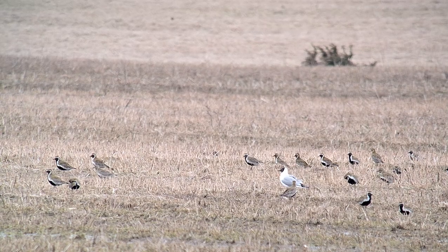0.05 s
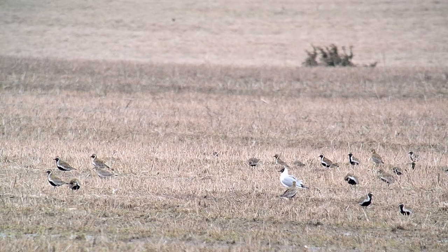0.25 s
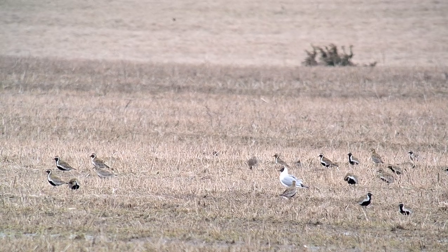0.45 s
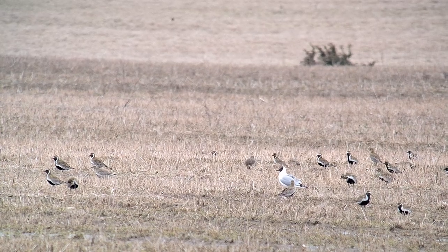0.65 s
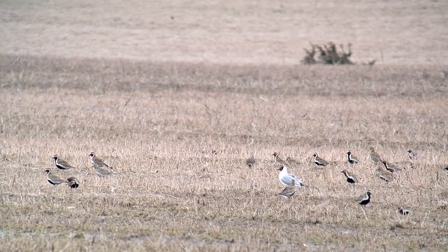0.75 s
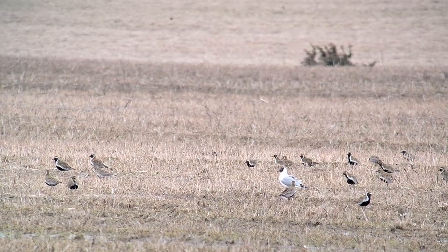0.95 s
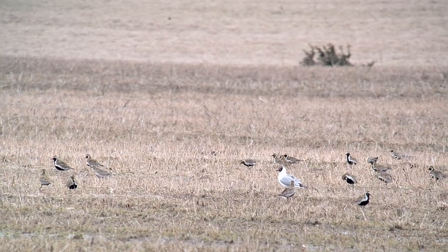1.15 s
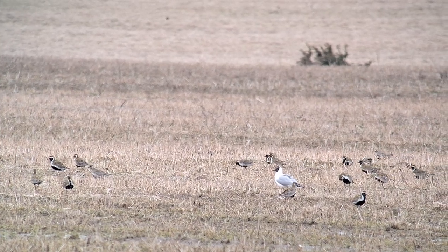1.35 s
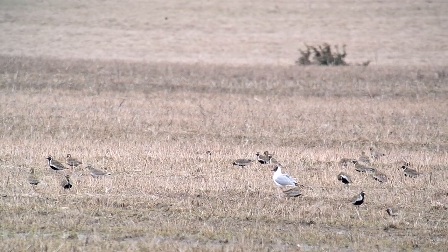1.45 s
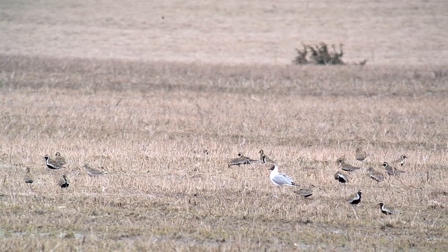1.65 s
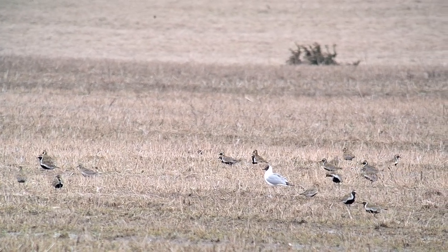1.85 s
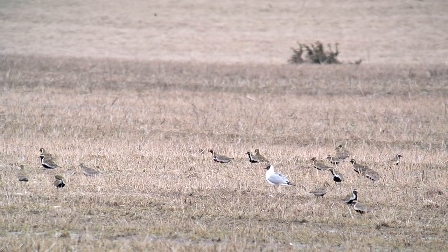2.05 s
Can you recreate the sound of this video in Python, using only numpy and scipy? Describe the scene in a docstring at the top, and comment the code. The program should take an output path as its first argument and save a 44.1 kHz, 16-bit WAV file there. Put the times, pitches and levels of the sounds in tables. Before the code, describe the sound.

Soft piping whistles from many far-off shorebirds, clearest in the second half, over a dry open field; heavy low wind thumps hit the microphone's left side early, fading to a low drone and light rustle.

```python
"""A flock of wading birds whistles far off on an open field: gliding tones, with hoarse squawks of noise.
Wind buffets the two microphone ports, mostly the left: low noise with short, sagging swings of pressure;
the faintest swings on the right are random swells of the low drone. Tiny clicks of the housing are
short fading tones. A distant drone, the rustle of the field and the hiss of the microphone
are coloured noise. After a short silence everything starts abruptly."""
import sys
import numpy as np
from scipy import signal
from scipy.fft import rfft, irfft, next_fast_len
from scipy.io import wavfile

SR = 44100
rng = np.random.default_rng(int(sys.argv[2]) if len(sys.argv) > 2 else 0)


def wav_out(sig):
    """Save sig, one row per channel (or a flat mono array), as 16-bit PCM at SR to the path in sys.argv[1]."""
    wavfile.write(sys.argv[1], SR, np.round(np.clip(np.atleast_2d(sig).T, -1, 1) * 32767).astype(np.int16))


def ratio(d):
    """dB to gain"""
    e = np.asarray(d, float) / 20
    return 10 ** e


N = 92610  # samples, 2.1 seconds


def rms_one(x):
    """Scales a sound so that its rms level is one."""
    return x / np.sqrt(np.mean(x ** 2) + 1e-20)


def in_time(rows):
    """Draws straight lines between (seconds, value) points, one value per sample."""
    seconds, values = np.transpose(rows)
    return np.interp(np.arange(N) / SR, seconds, values)


def drift(rate_hz, size=N):
    """Slow random wandering around zero, of rms one: noise smoothed twice."""
    r = np.exp(-2 * np.pi * rate_hz / SR)
    settle = 8000  # samples thrown away while the filter settles
    noise = rng.standard_normal(size + settle)
    return rms_one(signal.lfilter([1], [1, -2 * r, r * r], noise)[settle:])


def coloured(points):
    """Noise of rms one whose spectrum follows (Hz, dB) points; almost nothing outside them."""
    hz, db = np.transpose(points)
    size = next_fast_len(N)
    grid = np.arange(size // 2 + 1) * SR / size + 1  # the 1 avoids log(0)
    gain = ratio(np.interp(np.log(grid), np.log(hz), db, left=-120, right=-120))
    spectrum = rfft(rng.standard_normal(size)) * gain
    return rms_one(irfft(spectrum, size)[:N])


def sides(db):
    """Left and right gains that differ by db; positive is louder on the left."""
    return ratio(np.array([[.5], [-.5]]) * db)


# Loudness of the microphone hiss. Each row: time in seconds, level in dB.
HISS_LEVEL = [(.07, -74.5), (.3, -79), (.55, -79), (.8, -80.5), (1.25, -78), (1.6, -82), (2.1, -83)]
# Its tone colour. Each row: pitch in Hz, relative strength in dB per Hz.
HISS_COLOUR = [(900, -9.5), (1600, -1), (2300, -2.5), (3000, -6.5), (4500, -7), (6500, -13), (8400, -12),
               (12000, -8), (15500, -9.5)]


def microphone_hiss():
    """Hiss of the microphone: separate noise in each port, 1 dB stronger on the right."""
    noise = np.array([coloured(HISS_COLOUR) for _ in range(2)])
    return ratio(in_time(HISS_LEVEL)) * sides(-1) * noise


# Loudness of the distant drone. Each row: time in seconds, level in dB before the two noises are mixed.
DRONE_LEVEL = [(.1, -67), (.7, -65), (1.3, -65.5), (1.43, -62.5), (1.48, -59.5), (1.9, -60), (1.96, -62.5),
               (2.1, -64)]
# Its tone colour. Each row: pitch in Hz, relative strength in dB per Hz.
DRONE_TONE = [(40, -27.5), (60, 4.5), (90, 8), (130, -5.5), (210, -1), (290, -0.5), (340, -9.5),
              (390, -22.5), (520, -33)]


def distant_drone():
    """Low noise, partly the same in both ports and partly separate."""
    shared = coloured(DRONE_TONE)
    noise = np.array([0.7 * shared + 0.55 * coloured(DRONE_TONE) for _ in range(2)])
    return ratio(in_time(DRONE_LEVEL)) * sides(0.96) * noise


# Loudness of the field's rustle. Each row: time in seconds, level in dB.
RUSTLE_LEVEL = [(.07, -78), (.5, -83.5), (.8, -84), (.9, -79), (1.4, -76), (1.6, -81.5), (2.1, -84.5)]
# Its tone colour. Each row: pitch in Hz, relative strength in dB per Hz.
RUSTLE_COLOUR = [(250, -27), (400, 2), (600, -3.5), (1000, -4), (1500, -10), (2200, -27)]


def field_rustle():
    """Rustle of the field: mid-pitched noise, separate in each port."""
    noise = np.array([coloured(RUSTLE_COLOUR) for _ in range(2)])
    return ratio(in_time(RUSTLE_LEVEL)) * sides(1.7) * noise


def pressure_swing(u, hz, length, edge_db, db):
    """A few swings that sag in pitch, with a brief sharper edge; returns them and their outline."""
    spread = 0.6 * length  # seconds
    sag = 0.135  # share of the pitch lost per swing
    edge_s, edge_multiple = 0.0033, 2.31  # width of the edge; its pitch against the swing's
    shape = ratio(db) * np.exp(-.5 * (u / spread) ** 2)
    turn = 2 * np.pi * (hz * (u - sag * hz * u ** 2 / 2) + rng.random())
    edge_shape = ratio(db + edge_db) * np.exp(-.5 * (u / edge_s) ** 2)
    return shape * np.sin(turn) + edge_shape * np.sin(edge_multiple * turn), shape


# Low swings of pressure, left port then right: mostly wind buffets; the faintest on the right are
# random swells of the low drone. Each row: middle in seconds, peak of the outline in dB,
# pitch at the middle in Hz, length in seconds before the spread factor, sharp edge in dB against the peak.
PRESSURE_SWINGS = [
    [(0.139, -19.5, 89, 0.011, -13), (0.188, -23.5, 82.6, 0.015, -15.5), (0.21, -27.5, 68.4, 0.03, -35),
     (0.236, -36, 60, 0.0047, -18), (0.301, -28, 133.3, 0.0075, -14.5), (0.341, -30, 86, 0.026, -5.5),
     (0.359, -21, 75, 0.0053, -23), (0.379, -27, 62.5, 0.01, -24), (0.411, -29.5, 76.6, 0.011, -38),
     (0.474, -29.5, 91.2, 0.014, -12), (0.543, -33.5, 65.4, 0.011, -34), (0.569, -32, 66, 0.011, -43),
     (0.631, -36, 71.4, 0.022, -24), (0.676, -39.5, 70.6, 0.011, -33), (0.775, -36, 78.5, 0.013, -33),
     (0.818, -38.5, 73, 0.021, -26), (0.933, -38.5, 68.6, 0.02, -29), (1.021, -47.5, 52.5, 0.065, -19),
     (1.181, -45.5, 68, 0.013, -13), (1.317, -34, 66, 0.012, -31), (1.346, -42, 60.6, 0.0095, -20),
     (1.398, -37.5, 60.7, 0.01, -36), (1.454, -37.5, 62, 0.025, -32), (1.492, -42.5, 64, 0.014, -39),
     (1.525, -43, 72.5, 0.02, -27), (1.573, -38.5, 68, 0.014, -29), (1.609, -46, 79, 0.013, -2.5),
     (1.683, -52.5, 100, 0.012, -5)],
    [(0.089, -34, 77, 0.005, -31), (0.164, -35, 74.2, 0.0089, -19), (0.209, -38, 71.7, 0.022, -23),
     (0.27, -33, 71.4, 0.013, -33), (0.351, -38, 67, 0.017, -31), (0.43, -31.5, 61, 0.02, -35),
     (0.511, -38.5, 59.5, 0.023, -43), (0.543, -47, 84, 0.038, -38), (0.829, -48, 83, 0.044, -22),
     (1.033, -54, 58, 0.038, -1), (1.102, -49.5, 62.6, 0.045, -30), (1.575, -52.5, 98.5, 0.015, -10),
     (1.612, -50, 92, 0.011, -10)],
]
# Steady wind, left port, then right. Each row: time in seconds, level in dB before the trim and lumps.
STEADY_WIND = [
    [(.07, -40.5), (.12, -22), (.2, -27.5), (.35, -34.5), (.5, -35.5), (.6, -48), (.9, -52.5), (1.2, -59),
     (1.28, -61), (1.34, -48), (1.5, -49), (1.63, -63), (1.75, -63), (2.09, -57)],
    [(.07, -32.5), (.13, -33.5), (.2, -47), (.55, -52.5), (.62, -57.5), (.9, -63.5), (1.05, -59.5),
     (1.2, -57), (1.5, -59.5), (1.7, -63.5), (2.09, -56)],
]
# Tone colour of the wind. Each row: pitch in Hz, relative strength in dB per Hz.
WIND_TONE = [(20, -29), (32, -15.5), (45, 1.5), (88, -3), (130, -8.5), (200, -23), (300, -35.5), (450, -45),
             (700, -69)]


def wind_and_low_swings():
    """Each port has its own lumpy wind rumble and low swings; low noise swells with every swing."""
    trim_db, lumps_db, swing_noise_db = -6, 4, -12
    out, t = np.zeros((2, N)), np.arange(N) / SR
    for port in range(2):
        swell = np.zeros(N)
        for middle, db, hz, length, edge_db in PRESSURE_SWINGS[port]:
            near = slice(max(int((middle - .1) * SR), 0), int((middle + .1) * SR))
            swings, shape = pressure_swing(t[near] - middle, hz, length, edge_db, db)
            out[port, near] += swings
            swell[near] += shape
        bed = ratio(in_time(STEADY_WIND[port]) + trim_db + lumps_db * drift(10.0))
        out[port] += (bed + ratio(swing_noise_db) * swell) * coloured(WIND_TONE)
    return out


# Clicks. Each row: start in seconds, starting level in dB, pitch in Hz, left over right in dB.
CLICKS = [(.1005, -73, 5100, 3), (.1055, -73.5, 6150, -11.5), (0.1235, -52.5, 7830, -6),
          (.175, -58.5, 4320, -5)]


def housing_clicks():
    """Tiny clicks of the housing: short tones that die away at a steady dB rate."""
    t60_s = 0.0011  # seconds to fade by 60 dB
    out, u = np.zeros((2, N)), np.arange(300) / SR
    for start, db, hz, pan_db in CLICKS:
        i = int(start * SR)
        fade = ratio(db - 60 * u / t60_s)
        out[:, i:i + 300] += sides(pan_db) * fade * np.sin(2 * np.pi * hz * u)
    return out


def rough_burst(start, length, hz, width_hz, db, pan_db):
    """Noise squeezed into one band, swelling in and out and chopped unevenly."""
    swell_s, chop_db = .03, 2
    t = np.arange(N) / SR
    band = [hz - width_hz / 2, hz + width_hz / 2]
    sos = signal.butter(2, band, "band", fs=SR, output="sos")
    noise = rms_one(signal.sosfilt(sos, rng.standard_normal((2, N))))
    shape = np.clip(np.minimum(t - start, start + length - t) / swell_s, 0, 1)
    return sides(pan_db) * shape * ratio(db + chop_db * drift(120.0)) * noise


# Faint high patches of hiss. Each row: start in seconds, length in seconds, centre in Hz, width in Hz,
# level in dB before the chopping, left over right in dB.
HISS_PATCHES = [(.58, .2, 11000, 2200, -86.5, 0), (.625, 0.18, 7950, 700, -89.5, 0)]


def hiss_patches():
    """Faint bursts of high noise, shaped just like the squawks."""
    return sum(rough_burst(*row) for row in HISS_PATCHES)


# Hoarse squawks. Each row: start in seconds, length in seconds, centre in Hz, width in Hz,
# level in dB before the chopping, left over right in dB.
SQUAWK_ROWS = [(1.33, 0.095, 1834, 570, -70.5, 12.5), (1.39, 0.14, 1410, 580, -78, 5),
               (1.2, 0.11, 1750, 650, -80, 12.5), (0.455, 0.14, 1400, 500, -79, 4.5),
               (0.85, 0.11, 1900, 460, -84, 1), (1.7, 0.298, 1750, 500, -80.5, 7)]


def squawks():
    """Hoarse voices: rough bursts of noise in a resonance."""
    return sum(rough_burst(*row) for row in SQUAWK_ROWS)


def add_whistle(out, start, length, start_hz, top_hz, end_hz, db, octave_db, pan_db):
    """Pitch glides from start to top, then to its end; air on the way makes it flutter."""
    rise_share, attack_s, release_s = .38, .014, .01
    flutter_db, flutter_hz, waver = 1.8, 70, .005  # waver is a share of the pitch
    fade_db = 3.5  # softer away from the top
    u = np.arange(int(length * SR)) / SR
    size, x = len(u), u / length
    before_top = np.clip(1 - x / rise_share, 0, 1)
    after_top = np.clip((x - rise_share) / (1 - rise_share), 0, 1)
    hz = top_hz + (start_hz - top_hz) * before_top ** 1.49 + (end_hz - top_hz) * after_top ** 1.5
    hz = hz * (1 + waver * drift(40.0, size))
    turn = 2 * np.pi * (np.cumsum(hz) / SR + rng.random())
    ends = np.clip(np.minimum(u / attack_s, (length - u) / release_s), 0, 1)
    shape = np.sin(np.pi / 2 * ends) * ratio(-fade_db * (before_top ** 2 + after_top ** 2))
    shape = shape * np.sqrt(2)  # makes db an rms level
    lag = 1.53 + .25 * drift(20.0, size)  # radians between the ports
    i = int(start * SR)
    for port, gain in enumerate(sides(pan_db)[:, 0]):
        p = turn + port * lag
        level = ratio(db + flutter_db * drift(flutter_hz, size))
        tone = np.sin(p) + ratio(octave_db) * np.sin(turn + p)  # the second part is the octave
        out[port, i:i + size] += gain * shape * level * tone


def add_chatter(out):
    """Fainter whistles at random moments, mostly a little to the left; longer ones end lower."""
    per_second, low_hz, high_hz = 90, 1350, 1950
    for when, height, stretch, loudness, side in rng.random((int(per_second * N / SR), 5)):
        top = low_hz * (high_hz / low_hz) ** height
        add_whistle(out, when * N / SR, .025 + .04 * stretch, 1.1 * top, top, top * (1 - .15 * stretch),
                    -89.5 + 5 * loudness, -30, 3 + 8 * (side - .5))


# The clearest whistles. Each row: start in seconds, length in seconds, start pitch in Hz, top pitch in Hz
# (where the glide turns), end pitch in Hz, level in dB before fade and flutter,
# octave in dB against the tone, left over right in dB.
WHISTLES = [(0.098, 0.11, 1562, 1770, 1725, -87.5, -33, 0.5),
            (0.227, 0.042, 1710, 1858, 1740, -80.5, -26, 6.5),
            (0.266, .058, 1777, 1816, 1650, -85, -37, -10), (.322, 0.055, 2365, 2450, 2180, -81.5, -25, 12),
            (0.412, 0.087, 1220, 1325, 1165, -73.5, -1.5, 10),
            (.42, 0.018, 2180, 2190, 2190, -79, -31, -14), (0.512, 0.046, 1690, 1798, 1700, -78.5, -34, 6),
            (.512, 0.032, 1470, 1516, 1560, -78, -32, -2), (0.542, 0.04, 1460, 1454, 1380, -77.5, -33, -11),
            (0.641, 0.023, 1940, 1930, 1880, -79, -30, 4),
            (0.644, 0.076, 1603, 1577, 1405, -79.5, -54, -10),
            (0.718, 0.045, 1620, 1626, 1630, -76, -38, -3), (0.789, 0.036, 1620, 1646, 1570, -79, -26, -2),
            (0.864, 0.089, 1297, 1383, 1090, -74.5, -23, 10.5),
            (0.929, .03, 1540, 1594, 1470, -77, -36, 10), (1.178, 0.034, 4120, 4020, 4020, -86, -35, -10),
            (1.238, 0.034, 1750, 1760, 1750, -71.5, -35, 1),
            (1.266, 0.086, 1596, 1520, 1235, -71, -47, 3.5), (1.33, 0.032, 2600, 2690, 2720, -83.5, -30, 6),
            (1.347, 0.033, 1635, 1736, 1880, -66.5, -30, 6), (1.347, .06, 2040, 2170, 1950, -78.5, -30, 6),
            (1.398, 0.088, 1657, 1670, 1400, -68, -43, 2.5), (1.415, 0.086, 2300, 2276, 2316, -86, -30, 4),
            (1.488, 0.033, 1516, 1550, 1500, -77, -30, 2), (1.564, 0.081, 1676, 1689, 1384, -81, -35, -5),
            (1.63, 0.081, 1543, 1492, 1350, -83.5, -13, 3), (1.735, 0.041, 1630, 1613, 1600, -68.5, -47, 3),
            (1.761, 0.095, 1206, 1208, 1035, -81, -7, 0), (1.814, 0.056, 1620, 1680, 1580, -73.5, -34, 3.5),
            (1.889, 0.031, 1653, 1646, 1520, -71, -44, 6),
            (1.923, 0.077, 1416, 1350, 1090, -82.5, -7.5, 10),
            (1.993, .058, 2114, 2290, 2390, -79, -30, 11), (2.038, .065, 2370, 2430, 2260, -83, -33, 13),
            (1.984, 0.046, 1543, 1556, 1500, -75, -30, 4)]
# Echoes: delays in seconds, then levels in dB against the direct sound.
ECHO_DELAYS = [.023, .047]
ECHO_LEVELS = [-14, -19]


def flock():
    """The clearest whistles, a chatter of fainter ones behind, and echoes off the ground."""
    out = np.zeros((2, N + SR))  # spare room for whistles that run past the end
    for row in WHISTLES:
        add_whistle(out, *row)
    add_chatter(out)
    out = out[:, :N]
    wet = out.copy()
    for delay, db in zip(ECHO_DELAYS, ECHO_LEVELS):
        k = int(delay * SR)
        wet[:, k:] += ratio(db) * out[::-1, :-k]  # each echo swaps left and right
    return wet


def scene():
    """Adds all the layers together."""
    background = microphone_hiss() + distant_drone() + field_rustle()
    background = background + wind_and_low_swings() + housing_clicks()
    return background + hiss_patches() + squawks() + flock()


def top_cut(x):
    """Nothing passes above the cut-off."""
    return signal.sosfilt(signal.butter(12, 16350, fs=SR, output="sos"), x)


def record(dry):
    """Silence for the first 0.0695 seconds, then the whole mix at once."""
    started = np.arange(N) >= .0695 * SR
    return top_cut(dry * started)


dry = scene()
out = record(dry)
wav_out(out)
```